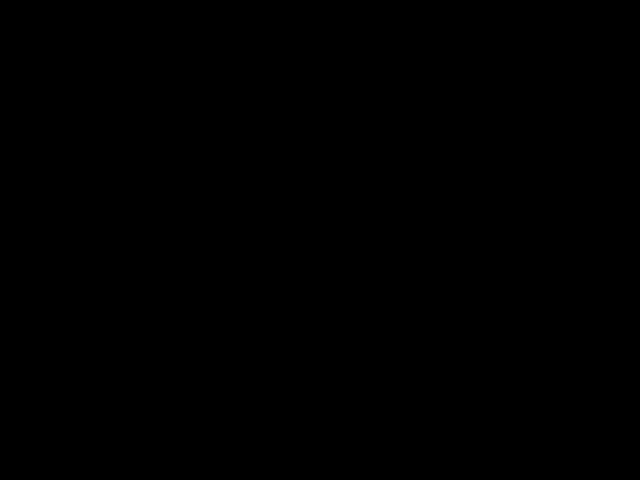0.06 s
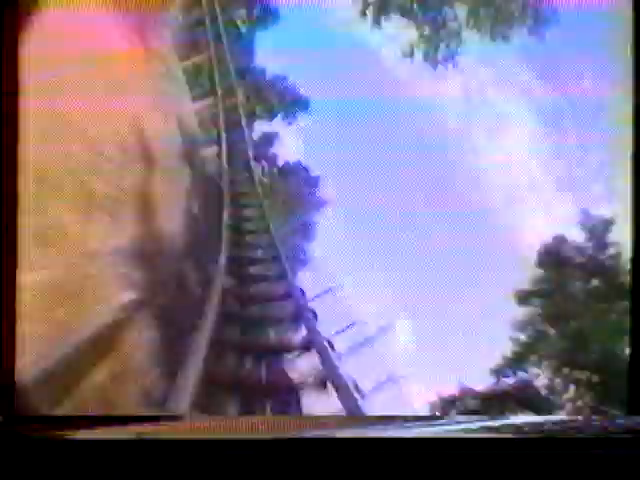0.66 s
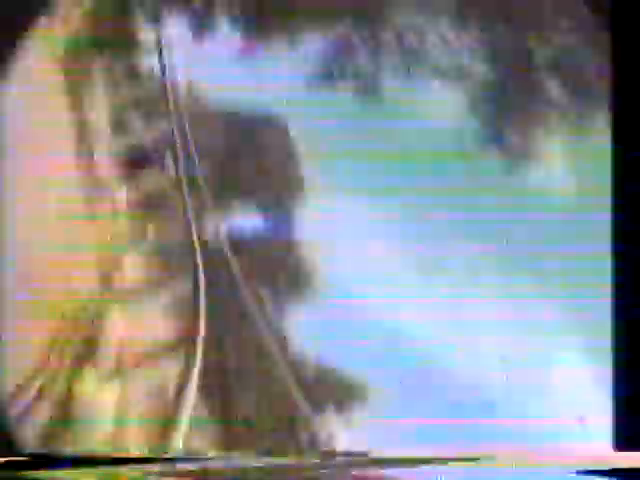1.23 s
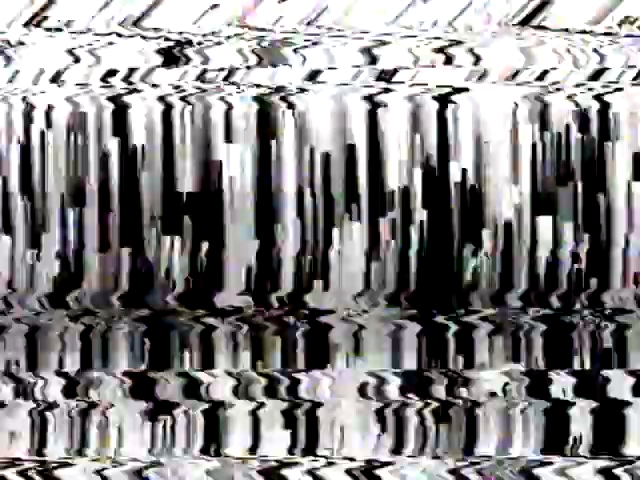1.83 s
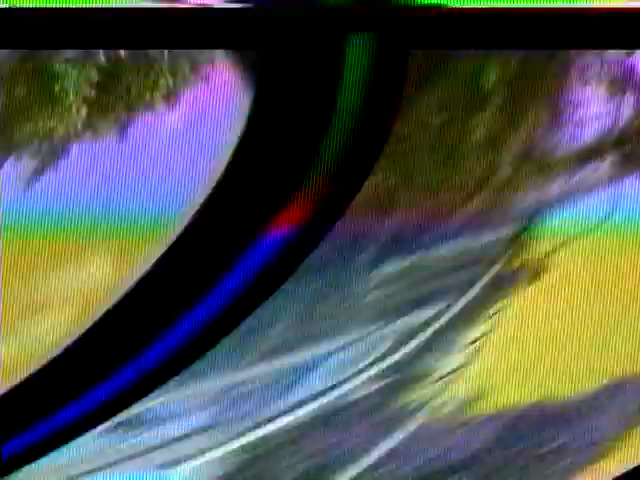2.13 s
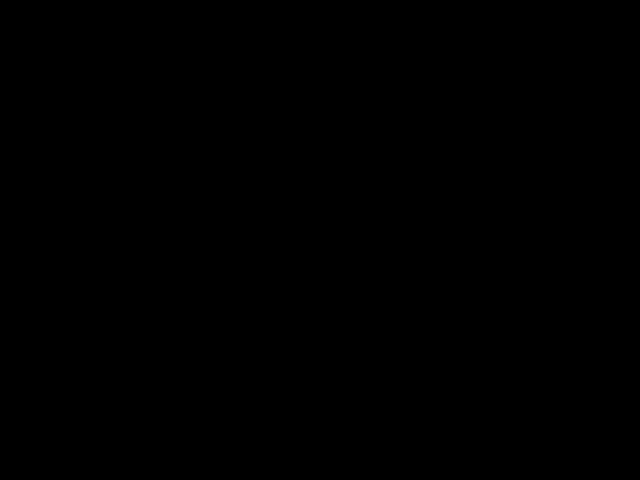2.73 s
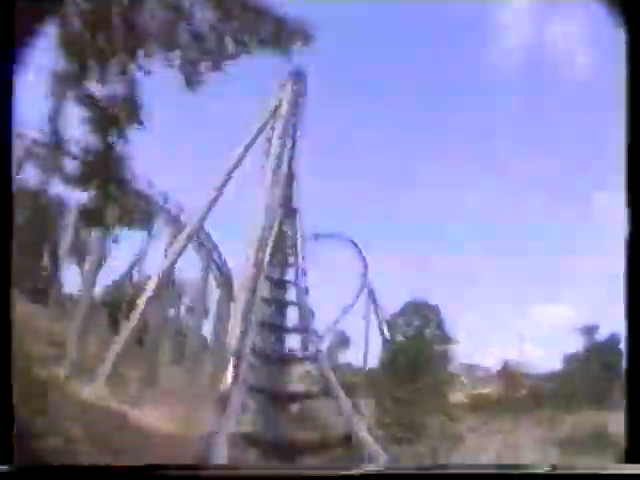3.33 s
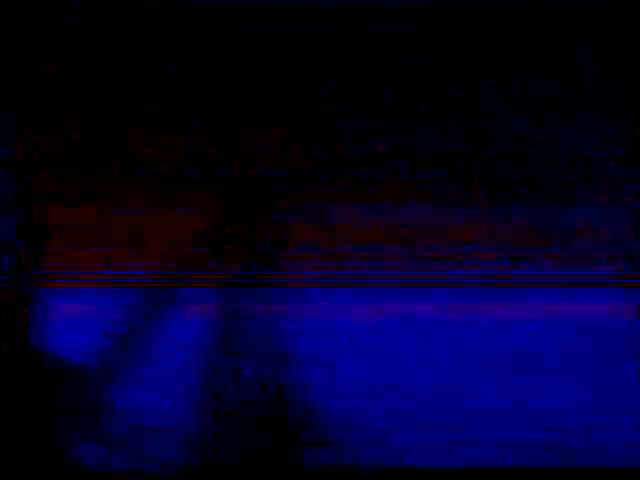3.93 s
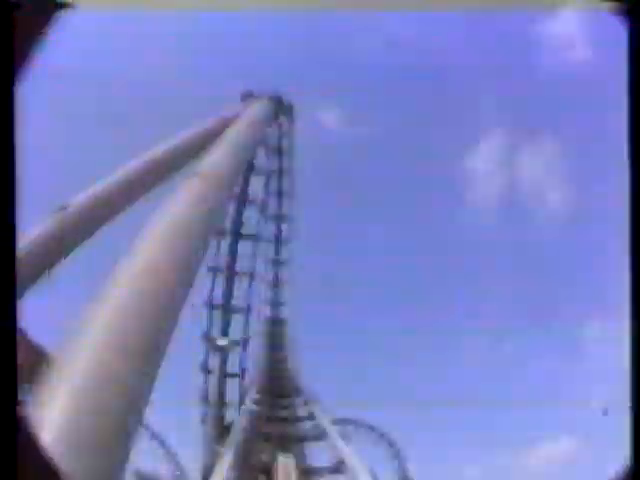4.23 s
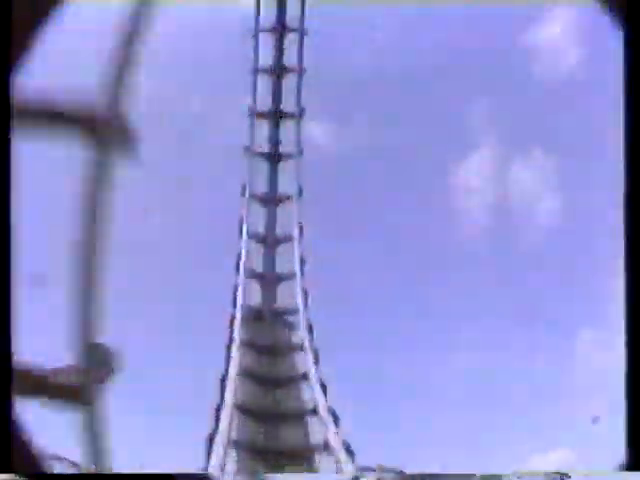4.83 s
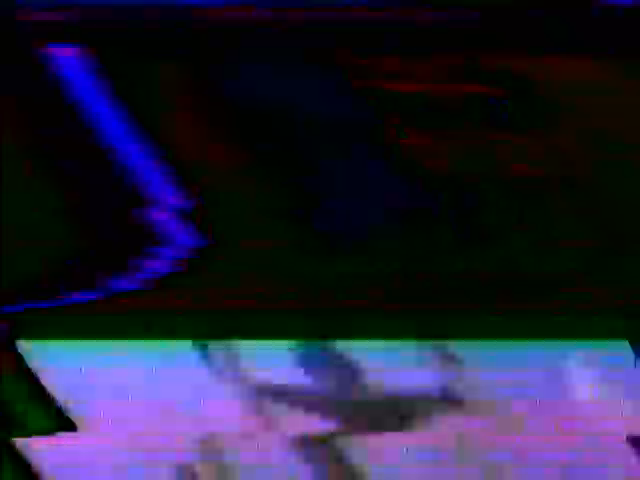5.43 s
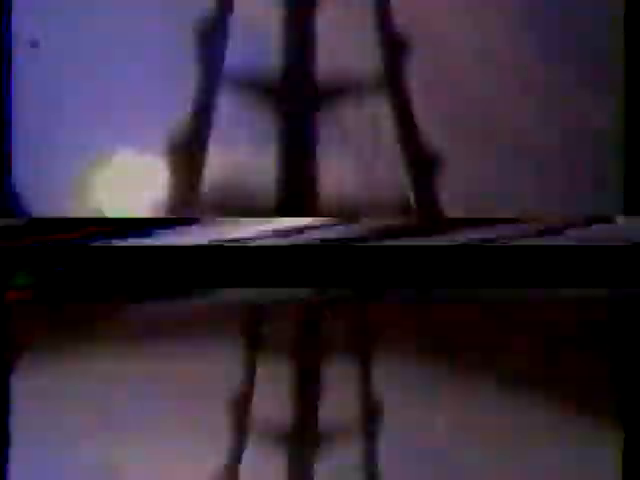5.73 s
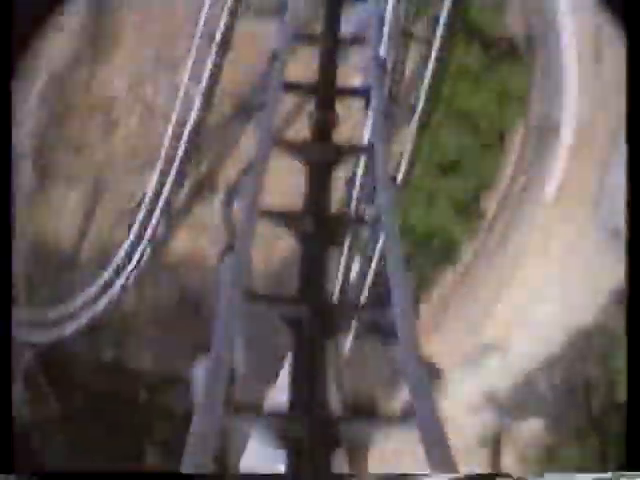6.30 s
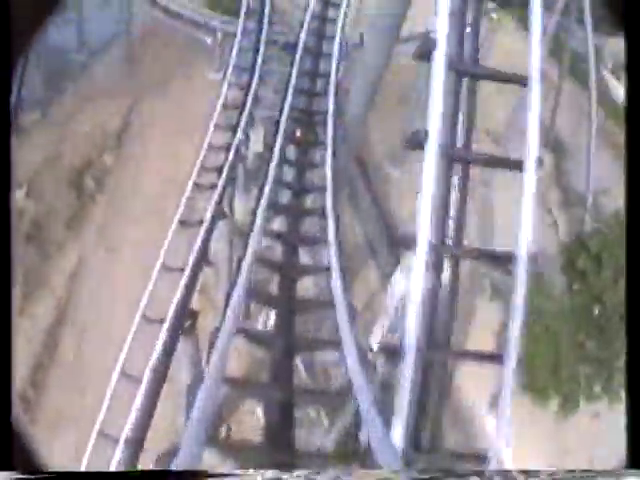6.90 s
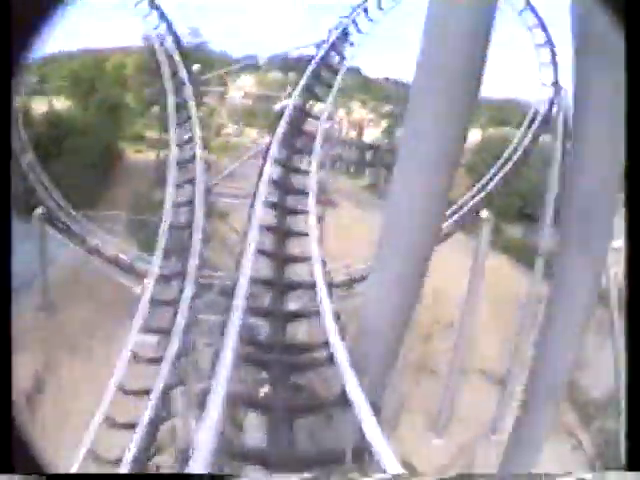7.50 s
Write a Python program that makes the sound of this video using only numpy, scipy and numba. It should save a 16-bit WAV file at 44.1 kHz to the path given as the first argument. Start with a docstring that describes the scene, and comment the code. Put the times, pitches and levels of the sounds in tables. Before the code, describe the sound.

Gusty, distorted wind roars on a roller coaster car's microphone over rushing wheels, cutting in and out like worn videotape.

```python
"""A roller coaster ride from a worn videotape. Hiss and buzz come first; the dull mono edge track
stands in briefly, then the main track plays, left only, dropping out and returning with thumps.
In the dip, wind buffets the camcorder's microphone and overloads its amplifier; wheels rush and sing.
The airstream weakens as the car climbs into a loop; near the top the rails hiss, air slaps the
microphone and the car rattles. On the dive out the wind breaks into gusts, with clicks and rattles."""
import sys
import numpy as np
from scipy import signal
from scipy.fft import rfft, irfft
from scipy.io import wavfile
from scipy.ndimage import uniform_filter1d
from numba import njit

SR = 44100
rng = np.random.default_rng(int(sys.argv[2]) if len(sys.argv) > 2 else 0)


def unload_audio(sound):
    """Save the sound as a 16-bit wav file, at the path given as the first command line argument."""
    columns = np.transpose(np.atleast_2d(sound))
    # keep every value between -1 and 1, then stretch to whole-number steps
    steps = np.round(np.clip(columns, -1, 1) * 32767)
    wavfile.write(sys.argv[1], SR, steps.astype(np.int16))


N = 333396
T = np.arange(N) / SR

# spans in which the tape's main track holds: found_s, lost_s
TRACK_LOCKED = [(.154, .166), (.698, 1.836), (2.085, 2.602), (2.818, 3.894), (4.032, 5.105), (5.39, 5.503),
                (5.79, 7.6)]
# airstream force, following the car's speed: time_s, force_db
AIR_FORCE = [(.3, -3), (.8, -5), (1.3, -4.5), (1.8, -9), (2.3, -8.5), (3.1, -10.5), (3.8, -13), (4.4, -14),
             (5.0, -23.5), (5.05, -27), (5.45, -34.5), (5.95, -36), (6.6, -34), (7.5, -31.5)]


def undb(db):
    """Decibels to gain."""
    return 10 ** (np.asarray(db) / 20)


def unit(x):
    """Scale to rms 1."""
    return x / np.sqrt(np.mean(x ** 2))


def curve(rows):
    """Linear interpolation of (time_s, value) rows."""
    return np.interp(T, *np.transpose(rows))


def noise():
    """White noise."""
    return rng.standard_normal(N)


def walk(rate_hz):
    """Random held levels, smoothed twice; spread near 1."""
    hold = int(SR / rate_hz)
    steps = noise()[np.arange(N) // hold]
    return uniform_filter1d(uniform_filter1d(steps, hold), hold)


def decay(start_s, decay_s):
    """Jump to 1, then exponential decay."""
    return (T >= start_s) * np.exp(-np.abs(T - start_s) / decay_s)


def colour(x, response):
    """Minimum-phase filter from (freq_hz, gain_db) rows."""
    hz, db = np.transpose(response)
    size = 4096
    grid_hz = np.maximum(np.fft.rfftfreq(size, 1 / SR), 1)
    cepstrum = irfft(np.log(undb(np.interp(np.log(grid_hz), np.log(hz), db))))
    cepstrum[1:size // 2] *= 2
    cepstrum[size // 2 + 1:] = 0
    return signal.fftconvolve(x, irfft(np.exp(rfft(cepstrum))))[:N]


def highpass(x, hz, order=1):
    """Coupling capacitor: flat tops droop, steps die away."""
    return signal.sosfilt(signal.butter(order, hz, "high", fs=SR, output="sos"), x)


def lowpass(x, hz, order=1):
    """A stage that lags its input."""
    return signal.sosfilt(signal.butter(order, hz, "low", fs=SR, output="sos"), x)


@njit
def resonate(x, hz, rel_width):
    """State-variable band-pass with a moving centre."""
    y, band, low = np.empty(len(x)), 0., 0.
    for i in range(len(x)):
        g = np.tan(np.pi * hz[i] / SR)
        v = (band + g * (x[i] - low)) / (1 + g * (g + rel_width))
        band, low = 2 * v - band, low + 2 * g * v
        y[i] = rel_width * v
    return y


@njit
def slew(x, max_rise):
    """Falls at once, rises by at most max_rise per sample."""
    y, v = np.empty(len(x)), 0.
    for i in range(len(x)):
        v = min(x[i], v + max_rise)
        y[i] = v
    return y


def tape_hiss(level_db=-95):
    """Faint, even hiss that stays on through dropouts."""
    return undb(level_db) * noise()


def player_hiss(locked, level_db=-61, muted_db=-20):
    """The player's dull rumble and hiss, turned down while the track is lost."""
    spectrum = [(30, 15.5), (120, -17), (500, -15.5), (1500, -32.5), (6000, -39), (15000, -41.5)]
    return undb(level_db) * unit(colour(noise(), spectrum)) * (locked + undb(muted_db))


def field_buzz(field_hz=59.94, burst_db=-53, fade_s=0.064, rest_db=-84):
    """The picture's field rate buzzes through at each loss of track, then fades."""
    bursts = sum(decay(lost_s, fade_s) for _, lost_s in TRACK_LOCKED)
    saw = signal.sawtooth(2 * np.pi * field_hz * T)
    buzz = unit(colour(saw, [(60, -1), (250, 2), (1500, 2.5), (6000, -18)]))
    return buzz * (undb(burst_db) * bursts + undb(rest_db))


def line_whistle(line_hz=15730, level_db=-72, waver_hz=18, sag_hz=260, pulse_db=3):
    """The picture's line rate whistles faintly, pulsing; its pitch sags most on a rough ride."""
    roughness = np.interp(curve(AIR_FORCE), [-34, -22], [.15, 1])
    hz = line_hz + waver_hz * walk(60) - sag_hz * roughness * np.clip(walk(22), 0, 1.2)
    return undb(level_db + pulse_db * walk(28)) * np.sin(2 * np.pi * np.cumsum(hz) / SR)


def gate(spans, release_s=0.0012):
    """Track gain: clicks open for each span, dies quickly after it."""
    held = sum((T >= on_s) * np.exp(-np.maximum(T - off_s, 0) / release_s) for on_s, off_s in spans)
    return uniform_filter1d(held, size=3)


def recovery(dip_db=-10.5, recover_s=0.0081):
    """Main track gain: starts low after each dropout and recovers."""
    return undb(dip_db * sum(decay(found_s, recover_s) for found_s, _ in TRACK_LOCKED))


def thumps():
    """Playback voltage jumps as the track is lost or found, then swings back slowly."""
    # voltage jumps: start_s, step
    jumps = [(0.154, -0.14), (0.166, 0.18), (0.696, 0.11), (1.841, -0.03), (2.085, -0.14), (2.818, -0.12),
             (3.9, 0.016), (5.391, -0.086), (5.501, 0.089), (5.792, -0.075)]
    steps = highpass(sum(step * (T >= start_s) for start_s, step in jumps), hz=3.58, order=2)
    return colour(steps, [(30, 6.5), (300, 4.5), (1000, 0), (3000, -44.5), (10000, -44.5)])


def wind(force_db, rel_width=0.64, flutter_db=3.0, flicker_db=1.1):
    """Eddies beat on the microphone; their bands flutter together and flicker alone."""
    # eddy shedding, slower at low speed: time_s, centre_hz
    eddies = [(.6, 484), (1.3, 464), (2.4, 421), (3.25, 380), (3.7, 327), (4.9, 302), (5.9, 226),
              (6.95, 225.6), (7.5, 256.6)]
    # buffeting bands: centre_ratio, level_db (at focus 1)
    bands = [(.4, -14.5), (0.622, -4), (0.947, -1.5), (1.348, -5.5), (1.999, -12.5), (3, -25)]
    centre_hz = curve(eddies)
    # a steady stream sheds a narrow band; weak puffs and violent gusts are broader
    focus = np.interp(force_db, [-24, -23, -9, -3.5], [1.1, 3, 1.11, 0.36])
    out = 0
    for ratio, db in bands:
        hz = centre_hz * ratio
        band = unit(resonate(resonate(noise(), hz, rel_width), hz, rel_width))
        out += band * undb(db * focus + flicker_db * walk(25))
    out /= np.sqrt(uniform_filter1d(out ** 2, size=2200) + 1e-6)  # even out slow level drift
    return unit(out * undb(flutter_db * walk(90))) * undb(force_db)


def rush(drive_db, eddy_swing, gain_db=4.0, grit_db=-0.4, surge_db=0.5, chop_db=3):
    """Air and wheels rush in grainy surges, chopped by each pressure swing of the eddies."""
    # rush spectrum: freq_hz, gain_db
    spectrum = [(100, -11.5), (500, 3), (800, 7), (1150, -2), (1550, -4), (2100, -7), (3000, -11),
                (4200, -13), (5600, -18.5), (7000, -19.5), (9500, -38.5), (11500, -44.5), (15500, -53)]
    rough_db = grit_db * walk(190) + surge_db * walk(22) + chop_db * np.clip(eddy_swing, -2, 2)
    return unit(colour(noise(), spectrum) * undb(rough_db)) * undb(drive_db + gain_db)


def air_hiss(gust_db, follow=0.74, surge_db=1, flicker_db=1.5):
    """Air tears off the camera's sharp edges: a fixed band of surging hiss."""
    # hiss spectrum: freq_hz, gain_db
    spectrum = [(4000, -32), (7500, -7.5), (8600, 1), (9900, 1), (10700, -8.5), (12000, -17), (15500, -23)]
    # hiss before gusts, gone once the car slows: time_s, level_db
    envelope = [(.3, -47.5), (1.5, -44), (2.3, -56.5), (2.85, -45.5), (3.1, -48), (3.35, -48.5),
                (3.85, -55), (4.05, -64), (4.18, -53.5), (4.85, -58.5), (5.1, -79), (5.8, -92)]
    level_db = curve(envelope) + follow * gust_db + surge_db * walk(14) + flicker_db * walk(75)
    return unit(colour(noise(), spectrum)) * undb(level_db)


def wheels(drive_db, gain_db=-43, follow=0.59, waver_db=1.9):
    """Wheels sing on the rails in wavering bands; they swell less with speed than the air."""
    # wheel resonances: pitch_hz, width_hz, relative_db
    modes = [(810, 280, 6.5), (1650, 430, 15.5), (3600, 700, -7), (5200, 500, -15), (7120, 500, -11)]
    song = 0
    for hz, width_hz, db in modes:
        gain = undb(db + waver_db * walk(10))
        song += gain * unit(resonate(noise(), hz * (1 + .003 * walk(3.2)), width_hz / hz))
    return song * undb(gain_db + follow * drive_db)


def steel_ring(transients, rolling_db=-81, waver_db=3.0, struck_db=6):
    """The car's steel rings in thin lines, fed by the rolling and by each burst and click."""
    # steel resonances: pitch_hz, width_hz, relative_db
    modes = [(5000, 200, -8), (5280, 45, -4.5), (7000, 50, 2.5)]
    out = 0
    for hz, width_hz, db in modes:
        centre_hz = np.full(N, float(hz))
        rolling = unit(resonate(noise(), centre_hz, width_hz / hz))
        rolling *= undb(rolling_db + waver_db * walk(9))
        struck = undb(struck_db) * resonate(transients, centre_hz, width_hz / hz)
        out += undb(db) * (rolling + struck)
    return out


def saturate(x, top, bottom, knee):
    """An amplifier stage flattens swings at unequal upper and lower limits."""
    return x / (1 + np.abs(x / np.where(x > 0, top, bottom)) ** knee) ** (1 / knee)


def overload(x, sag=1.68, hang_hz=320, hang_ratio=1.76, snap_hz=2500, rise_per_s=850):
    """Stage one cuts upward swings first and droops; stage two cuts downward ones and rises slowly."""
    headroom = 1 / (1 + sag * uniform_filter1d(np.abs(x), size=14000))  # shrinks under long, hard drive
    limit = 0.14 * headroom
    cut = saturate(x, top=limit, bottom=1.05 * headroom, knee=1.86)
    # crackle: after a hard swing the stage hangs at its limit, then snaps back
    hang = (lowpass(x, hang_hz) > hang_ratio * limit) * (limit - cut)
    first = highpass(cut + lowpass(hang, snap_hz, order=2), hz=201)
    second = saturate(first, top=0.35 * headroom, bottom=0.25 * headroom, knee=9.4)
    return highpass(slew(second, rise_per_s / SR), hz=30)


def edge_track(sound):
    """The tape's dull mono edge track stands in once for the main track."""
    # edge track playing: start_s, end_s
    spans = [(.331, .698)]
    # edge track response: freq_hz, gain_db
    response = [(40, 6), (300, -8), (800, -8.5), (1500, -8), (4000, -8.5), (9500, -8.5), (11500, -23),
                (15500, -32)]
    return gate(spans) * colour(highpass(sound, hz=290), response)


def gusts(attack_s=0.012, release_s=0.0091):
    """Gusts swell, hold and die away; returns the changes of buffeting and rush in dB."""
    # gusts and lulls: start_s, hold_s, buffet_change_db, rush_change_db
    events = [(0.699, 0.17, -2, 8.5), (1.431, 0.15, -5.5, 1), (1.54, 0.05, 6, 4), (2.494, 0.036, -5.5, -9),
              (2.558, 0.037, 3, 3.5), (2.855, 0.07, 2.5, 1.5), (3.14, 0.047, 3.5, 6), (3.389, .07, 2, 2),
              (3.59, 0.037, -9, -2), (3.635, 0.15, 3, 1.5), (3.852, 0.03, 6.5, -4), (4.068, 0.077, 1.5, 0),
              (4.139, 0.037, -1, 4), (4.169, 0.089, 3.5, 4), (4.319, 0.096, 1, 0.5),
              (4.421, .09, 5.5, -0.5), (4.699, 0.037, 7.5, 0), (4.74, 0.057, 2, -0.5),
              (4.855, 0.17, 1.5, -0.5), (4.99, .025, 5.5, 6), (5.04, 0.017, -5, 1), (5.408, 0.047, 4.5, -7),
              (5.845, 0.051, 11, 2), (6.112, 0.033, 10.5, 2), (6.2, 0.023, -0.5, -6),
              (6.266, 0.024, 10.5, 9), (6.32, 0.042, -5, 0), (6.388, 0.094, 9, 2), (6.49, 0.017, 7, 0),
              (6.555, 0.049, -1.5, 0), (6.654, 0.105, 12.5, 5), (6.78, 0.059, 5, -4),
              (6.83, 0.15, 2.5, 2.5), (7.005, 0.048, 13, 8.5), (7.075, 0.097, -3.5, -3),
              (7.235, 0.069, 10, 2.5), (7.317, 0.017, -2, -12), (7.396, 0.035, 8.5, 1),
              (7.452, 0.02, 12, -4), (7.512, 0.04, 5.5, -3)]
    change_db = 0
    for start_s, hold_s, buffet_db, rush_db in events:
        swell = 1 - np.exp(-np.maximum(T - start_s, 0) / attack_s)
        release = np.exp(-np.maximum(T - start_s - hold_s, 0) / release_s)
        change_db += np.outer([buffet_db, rush_db], swell * release)
    return change_db


def whistle_and_rings(rel_width=0.027):
    """Brief narrow-band sounds: a whistling surge of air hiss, then short steel rings."""
    # narrow-band swells: peak_s, pitch_hz, half_length_s, level_db
    swells = [(3.117, 8800, .03, -41), (4.966, 1020, 0.01, -29.5), (6.933, 1470, 0.038, -50),
              (7.042, 9950, 0.0057, -68), (7.42, 9900, .008, -69)]
    out = 0
    for peak_s, hz, half_s, db in swells:
        band = unit(resonate(noise(), np.full(N, float(hz)), rel_width))
        out += undb(db) * band * np.exp(-((T - peak_s) / half_s) ** 2)
    return out


def rail_hiss_and_rattles(grain_db=1.5, rise_s=0.0015):
    """Noisy bursts: two swells of rail hiss, then loose parts rattling."""
    # noise bursts: start_s, level_db, length_s
    bursts = [(4.74, -39, 0.12), (4.868, -44.5, 0.091), (4.956, -30, 0.011), (4.971, -35, 0.025),
              (5.026, -38.5, 0.014), (5.391, -39.5, 0.016), (5.417, -44.5, 0.042), (5.464, -43, 0.038),
              (6.34, -53, 0.04), (6.582, -55, .02), (6.63, -50.5, 0.038), (6.873, -42, 0.034),
              (6.99, -50, 0.036), (7.137, -48.5, 0.034), (7.162, -49, 0.067), (7.286, -46, 0.066),
              (7.365, -47, 0.02)]
    # burst spectrum: freq_hz, gain_db
    spectrum = [(400, 8.5), (1000, 13), (2000, 6), (3300, 7), (5000, 0), (7000, -3.5), (9500, -14),
                (11500, -65.5), (15500, -39)]
    envelope = 0
    for start_s, db, length_s in bursts:
        age_s = np.maximum(T - start_s, 0)
        envelope += undb(db) * (1 - np.exp(-age_s / rise_s)) * np.exp(-(age_s / length_s) ** 2)
    return envelope * unit(colour(noise() * undb(grain_db * walk(400)), spectrum))


def slaps(swing_hz=270, decay_s=0.002, rise_s=0.0012, crack_db=-17):
    """One large eddy: sudden suction, then quickly dying pressure swings."""
    # eddies hitting the microphone: start_s, relative_db
    hits = [(4.893, 1), (4.938, -8), (5.011, -2), (5.069, -9), (5.902, -16.5), (6.129, -19), (6.169, -19),
            (6.2336, -9), (6.267, -5), (6.393, -9), (6.407, -18), (6.428, -11), (6.512, -8.5), (6.662, -9),
            (7.009, -6), (7.239, -8.5), (7.408, -9.5)]
    spectrum = [(200, 2.5), (600, 5), (1200, -15), (4000, -29), (10000, -50)]
    crack = undb(crack_db) * unit(colour(noise(), spectrum))
    out = 0
    for start_s, db in hits:
        age_s = np.maximum(T - start_s, 0)
        envelope = undb(db) * (1 - np.exp(-age_s / rise_s)) * np.exp(-age_s / decay_s)
        out += envelope * (crack - np.sin(2 * np.pi * swing_hz * age_s))
    return out


def clicks(decay_s=0.00079, rel_width=1.0, snap=6, gain_db=6):
    """Sharp clicks: small ticks from the car, and the overloaded microphone crackling in gusts."""
    # clicks: start_s, relative_db, centre_hz
    events = [(4.9597, -29, 3300), (6.875, -46, 4000), (6.989, -41.5, 4500), (7.011, -40, 2200),
              (7.03, -43, 2200), (7.045, -36, 3200), (7.063, -46, 1500), (7.069, -45, 1500),
              (7.22, -51, 6500), (7.246, -42, 4400), (7.253, -36, 1800), (7.274, -47, 3000),
              (7.403, -53, 7000), (7.41, -41, 2000), (7.419, -55, 8000), (7.472, -37, 1600),
              (7.481, -47, 1600)]
    out = 0
    for start_s, db, hz in events:
        pulse = noise() * decay(start_s, decay_s)
        pulse[int(start_s * SR)] += snap
        centre_hz = np.full(N, float(hz))
        crack = resonate(resonate(pulse, centre_hz, rel_width), centre_hz, rel_width)
        out += undb(db + gain_db) * crack / np.abs(crack).max()
    return out


def scene():
    """Pressure at the single microphone on the car; the airstream drives wind, rush and wheels."""
    stream_db = curve(AIR_FORCE)
    buffet_gust_db, rush_gust_db = gusts()
    force_db = stream_db + buffet_gust_db
    drive_db = -20.5 + 0.95 * stream_db + rush_gust_db
    buffeting = wind(force_db)
    air = buffeting + slaps() + rush(drive_db, buffeting / undb(force_db)) + air_hiss(rush_gust_db)
    transients = rail_hiss_and_rattles() + clicks()
    pressure = air + wheels(drive_db) + whistle_and_rings() + transients + steel_ring(transients)
    return np.array([pressure, pressure])


def record(dry, gain_db=7.0, thump_leak_db=-23, whistle_leak=.1, top_hz=15850):
    """Overloaded amplifier, then a tape whose main track plays on the left and drops out."""
    # microphone response: freq_hz, gain_db
    mic_response = [(30, 1.5), (100, -1.5), (250, 0), (1000, -4), (2500, -6), (5000, -6.5), (7000, -7),
                    (9300, -1), (11500, -5.5), (15500, -5.5)]
    sound = undb(gain_db) * colour(overload(dry[0]), mic_response)
    locked, thump = gate(TRACK_LOCKED), thumps()
    both = edge_track(sound) + player_hiss(locked) + tape_hiss()
    whistle = np.maximum(locked, whistle_leak) * line_whistle()
    left = locked * recovery() * sound + whistle + thump + field_buzz() + both
    right = undb(thump_leak_db) * thump + both
    band_limit = signal.ellip(10, .2, 70, top_hz, fs=SR, output="sos")
    return signal.sosfilt(band_limit, np.array([left, right]))


dry = scene()
out = record(dry)
unload_audio(out)
```